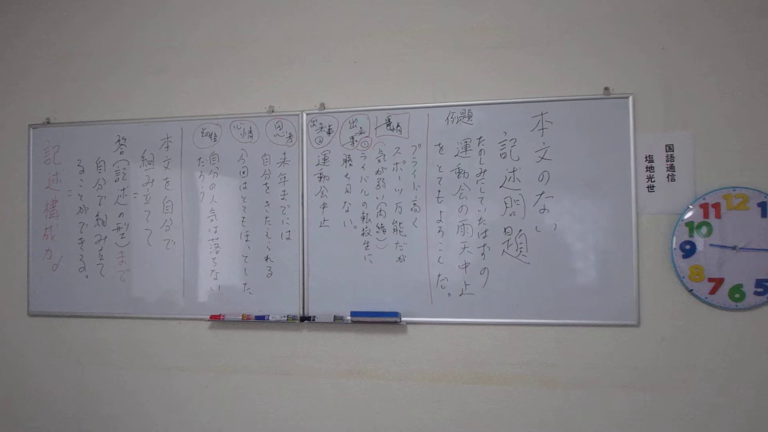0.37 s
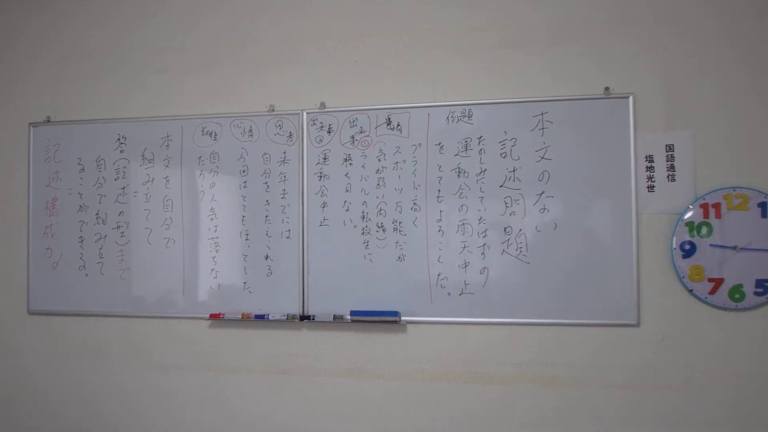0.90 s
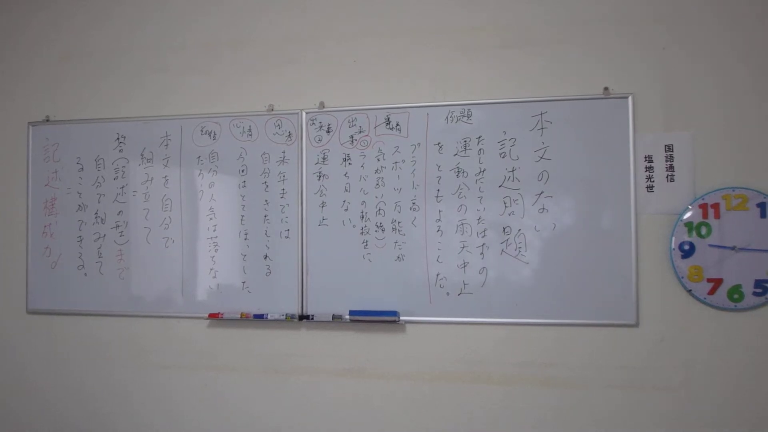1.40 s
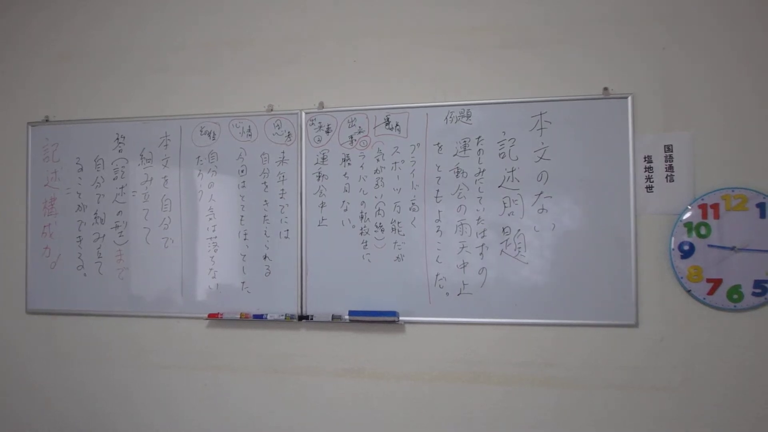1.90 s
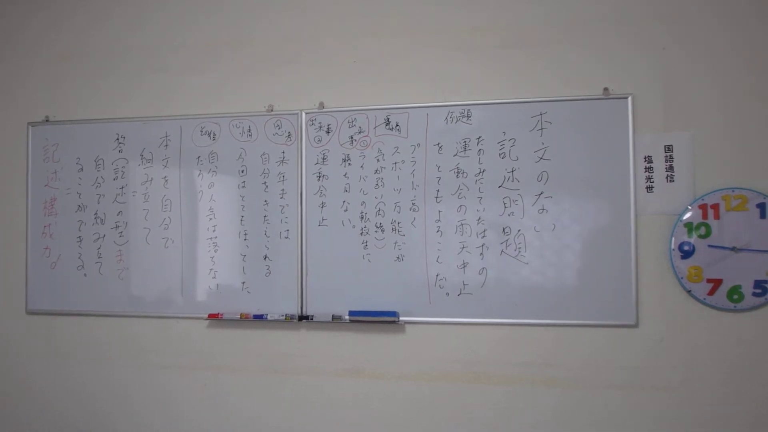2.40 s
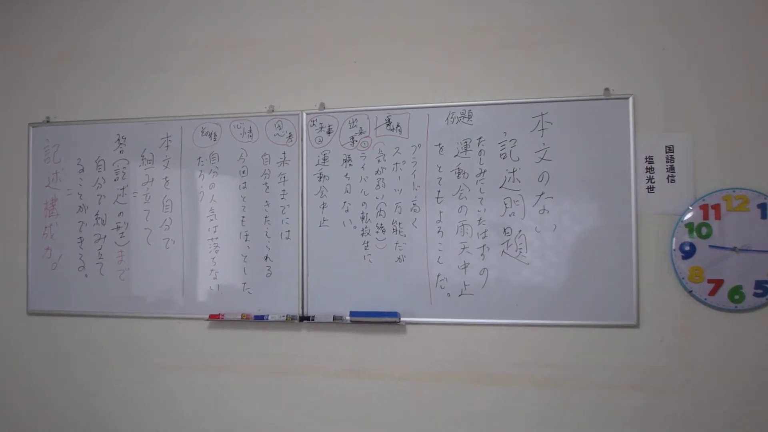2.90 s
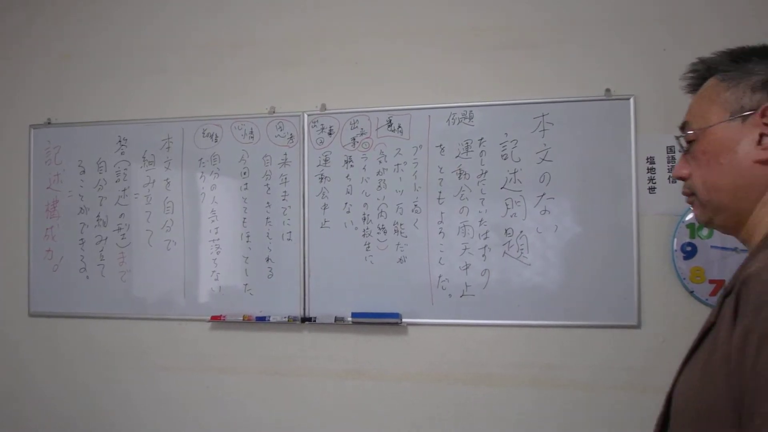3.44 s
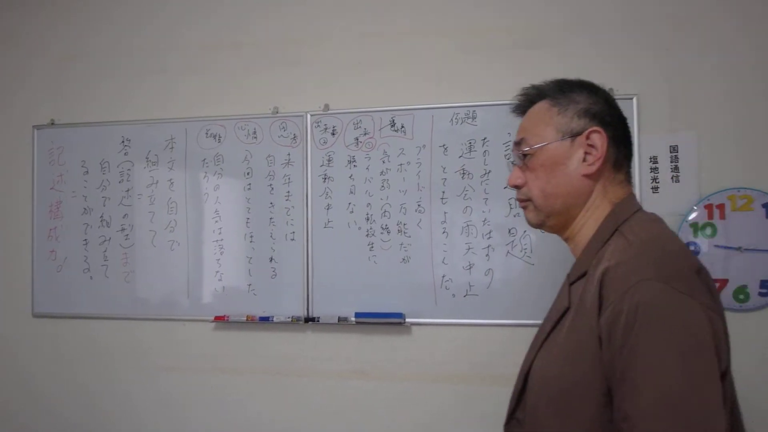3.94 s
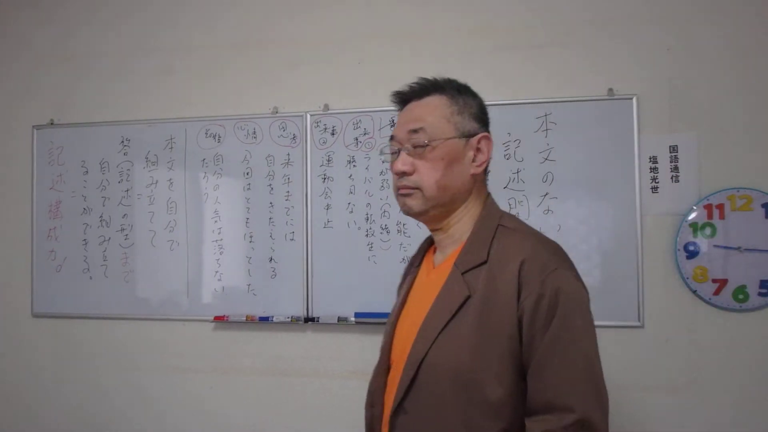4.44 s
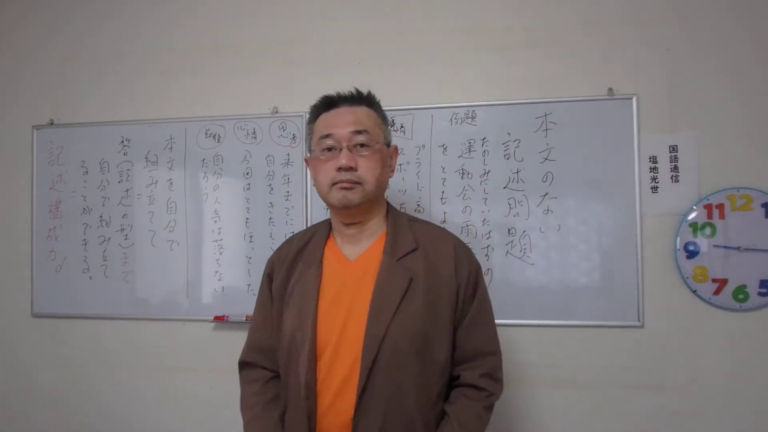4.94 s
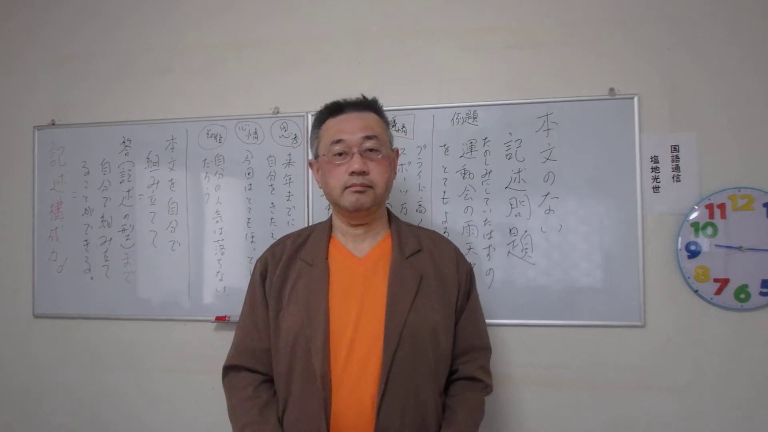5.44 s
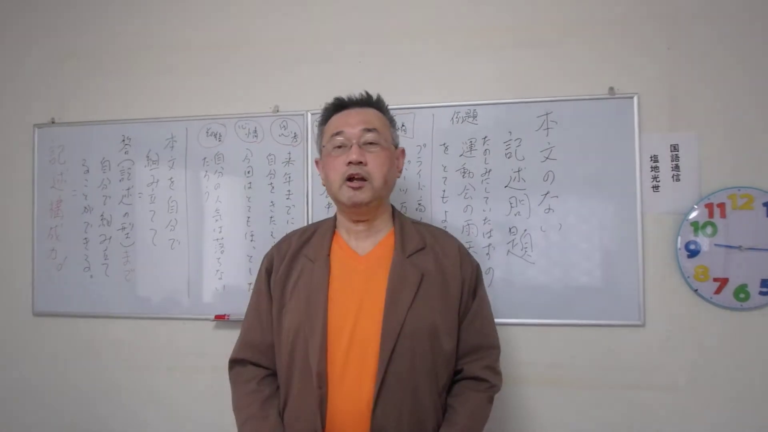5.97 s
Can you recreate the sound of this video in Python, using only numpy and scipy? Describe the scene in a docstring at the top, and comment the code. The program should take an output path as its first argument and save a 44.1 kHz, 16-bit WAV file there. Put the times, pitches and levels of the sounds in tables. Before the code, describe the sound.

Loose-soled footsteps thud and scuff across a hollow hard floor in a small bare room, with a brief rattle near the end.

```python
"""Loose soles in a bare room

Someone in loose soles walks over a hollow hard floor in a small bare room. Each step is a damped low thud
and a noise slap, both convolved with the echoes of the room; sliding soles scuff as grainy noise and
sometimes catch with a crack. A camera stand jolts at low pitch and rattles in brief ringing modes.
Under all lies steady room and preamp noise; the camera adds gain control, a bass cut and narrow notches."""
import sys
import numpy as np
from scipy import signal
from scipy.io import wavfile
from scipy.ndimage import uniform_filter1d, minimum_filter1d

SR = 44100
rng = np.random.default_rng(int(sys.argv[2]) if len(sys.argv) > 2 else 0)


def to_linear_factor(level_db):
    """Convert decibel levels (scalar or array-like) to linear amplitude factors."""
    exponent = np.asarray(level_db, float) / 20
    return 10 ** exponent


def bounce(signal):
    """Save signal as a 16-bit WAV file at the path given by the first command-line argument."""
    frames = np.transpose(np.atleast_2d(signal))
    limited = np.clip(frames, -1, 1)
    pcm = np.round(limited * 32767).astype(np.int16)
    wavfile.write(sys.argv[1], SR, pcm)


N = 268436
EDGES = 25 * 2 ** np.arange(0, 9.5, 1 / 3)   # third-octave band edges in Hz


def rms_one(x):
    """Power normalisation: scale to rms 1."""
    return x / np.sqrt(np.mean(x ** 2) + 1e-20)


def unit_energy(x):
    """Energy normalisation: scale so that the squares add up to 1."""
    return x / np.sqrt(np.sum(x ** 2))


def at_hz(points, hz):
    """Pitch is logarithmic: interpolate a table on a log-frequency axis."""
    table = np.array(points)
    return np.interp(np.log(hz), np.log(table[:, 0]), table[:, 1])


def butter(x, hz, kind, order=2):
    """Causal filtering with a maximally flat Butterworth response."""
    return signal.sosfilt(signal.butter(order, hz, kind, fs=SR, output="sos"), x)


def colour(x, spectrum):
    """Spectral shaping by a causal bank of wide bands, each with its own gain."""
    total = 0
    for low, high in zip(EDGES[::2], EDGES[2::2]):
        gain = to_linear_factor(at_hz(spectrum, np.sqrt(low * high)))
        total = total + gain * butter(x, [low, high], "band", order=1)
    return total


def dying(t, t60):
    """Exponential decay: 60 dB in t60 seconds."""
    return to_linear_factor(-60 * t / t60)


def add(out, x, s):
    """Superposition: mix x in at time s."""
    i = round(s * SR)
    out[..., i:i + x.shape[-1]] += x[..., :N - i]


def leaning(x):
    """Level difference between the ears: a close sound is 3.5 dB stronger on the right."""
    return x * to_linear_factor(3.5 * np.array([[-.5], [.5]]))


# Likeness of the two close microphones. Each row: frequency in Hz, left-right correlation of the background.
LIKENESS = [(60, 0.52), (600, 0.6), (2000, 0.86), (4000, 0.68), (8000, 0.43), (14000, 0.1)]
# Balance of the microphones. Each row: frequency in Hz, right channel above left in dB.
RIGHT_DB = [(100, 2), (2000, 2.5), (4000, 2), (8000, -1), (12000, 1)]


def bands(size, spread=1.0):
    """Partial coherence: stereo noise in third octaves, mixed from mid and side; spread scales unlikeness."""
    white = rng.standard_normal((2, 2, size))
    for k, (low, high) in enumerate(zip(EDGES, EDGES[1:])):
        mid, side = butter(white[k % 2], [low, high], "band")
        hz = np.sqrt(low * high)
        alike = np.clip(1 - spread * (1 - at_hz(LIKENESS, hz)), 0, 1)
        both = np.sqrt(1 + alike) * mid + np.sqrt(1 - alike) * side * [[1], [-1]]
        yield hz, both * to_linear_factor(at_hz(RIGHT_DB, hz) * np.array([[-.5], [.5]]))


# Footfalls. Each row: start in seconds, thud level in dB, thud pitch in Hz, cycles until the boards swing
# fully, slap relative to thud in dB, room relative to direct sound in dB (the last two before overall gains).
STEPS = [(.568, -12.5, 155, 1.5, -15.5, -7.5), (.63, -24.5, 161, 1, -17, -3.5),
         (1.346, -22, 144.7, 1.8, -17, -1), (1.370, -7.5, 166, 0.87, -4, -4),
         (1.535, -21, 125.5, 1.3, -8, -7.5), (2.031, -26.5, 123, .7, -14.5, 0),
         (2.236, -21, 132, 1.04, -16.5, -1.5), (2.30, -27, 205, 1.2, -4.5, -9.5),
         (2.708, -33.5, 207.6, 1.7, -18, -2), (2.764, -33, 136, 0.81, -7, -4.5),
         (2.882, -21.5, 118, 1.1, -19, 1), (3.232, -33, 184, 1.7, -26, -5.5),
         (3.381, -34, 96.3, 1.1, -16, -2), (3.601, -24.5, 227, 1.6, -4.5, -2.5),
         (3.665, -31.5, 289, 3.7, -1, -15.5), (3.945, -28, 102, 1.1, -17, -6),
         (4.000, -13.5, 140, 1.8, -5.5, 1.5), (4.170, -23, 122.6, 3.1, -7.5, -1.5),
         (4.596, -25.5, 105.8, 2.8, -14, -5), (4.638, -3.5, 110, 1.31, -12, -13.5),
         (5.031, -7, 164.6, 2.8, -9, -1.5)]
# Colour of the slap. Each row: frequency in Hz, relative spectral density in dB.
SLAP = [(120, 9), (250, 2), (400, 15), (800, -30.5), (1500, -20), (2800, -62), (4500, -14), (8000, -13)]


def steps():
    """Impact excitation: boards swell into a damped thud, the sole slaps the air out, the room answers both."""
    slap_gain_db, echoed_slap_gain_db, room_gain_db = 21, 21, 13.5
    roundness = 1.95   # higher starts softer and ends sooner
    out, t = np.zeros((2, N)), np.arange(int(.25 * SR)) / SR
    half, quarter = len(t) // 2, len(t) // 4
    tails = [room_tail() for spot in range(7)]
    crack = butter(colour(1. * (t == 0), SLAP), 4000, "low")
    for k, (s, db, hz, cycles, slap_db, room_db) in enumerate(STEPS):
        boards = np.sin(2 * np.pi * hz * t) + 0.4 * np.sin(2 * np.pi * 1.925 * hz * t)
        swell = t * hz / cycles
        direct = boards * (swell * np.exp(1 - swell)) ** roundness

        contact = rng.standard_normal(len(t)) * dying(t, 0.058)   # the sole lands unevenly
        slap = unit_energy(np.convolve(contact[:half], crack[:quarter])[:half])
        direct[:half] += to_linear_factor(slap_db + slap_gain_db) * slap
        add(out, leaning(to_linear_factor(db) * direct), s)

        # the air is pushed once, so the echoes are broad in pitch
        push = np.sin(2 * np.pi * 1.41 * hz * t) * dying(t, 3.05 / hz)
        push = butter(push, 0.62 * hz, "high")
        push += to_linear_factor(slap_db + echoed_slap_gain_db) * unit_energy(crack)
        echoes = signal.fftconvolve(push[None], tails[k % len(tails)], axes=1)
        add(out, to_linear_factor(db + room_db + room_gain_db) * echoes, s)
    return out


# Standing waves of the room. Each row: frequency in Hz, relative level in dB, t60 in seconds.
ROOM_MODES = [(140, -3.5, 0.41), (208, -1.5, 0.4), (301, 3, 0.34), (338.5, -3.5, 0.53), (400, -8, 0.12),
              (452.8, 0.5, 0.37), (489, 3, 0.23), (583, -3, 0.4), (662, 0, 0.34), (859, -9, 0.23),
              (970, -21, 0.31)]
# Reverberation of the room. Each row: frequency in Hz, t60 in seconds.
ROOM_T60 = [(60, 0.72), (150, 0.41), (500, 0.64), (1500, 0.5), (4000, 0.26), (10000, 0.04)]


def room_tail(modes_db=-13.5, build_s=0.014):
    """Reverberation from one spot: a diffuse field dying band by band, plus standing waves of varied strength."""
    t = np.arange(int(.7 * SR)) / SR
    diffuse = 0
    for hz, band in bands(len(t), 0.12):   # steps differ less between the microphones than the background
        t60 = at_hz(ROOM_T60, hz)
        diffuse = diffuse + np.sqrt(hz * t60) * unit_energy(band * dying(t, t60))
    standing = 0
    for hz, db, t60 in ROOM_MODES:
        strength = to_linear_factor(db + 2 * rng.standard_normal())
        standing = standing + strength * dying(t, t60) * np.sin(2 * np.pi * (hz * t + rng.random()))
    standing = leaning(to_linear_factor(modes_db) * standing)
    build_up = 1 - np.exp(-t / build_s)
    return (diffuse / SR ** .5 + standing / 100) * build_up


# Soles sliding on the floor. Each row: time of the peak in seconds, hiss level in dB, swell time in seconds,
# low rasp relative to hiss in dB, thin top relative to hiss in dB.
SCUFFS = [(.36, -59, .4, -8, -33), (0.593, -48, 0.047, 1, -7), (.8, -49, 0.22, -3.5, -9),
          (1.385, -44, 0.035, 10, -6), (1.57, -52.5, 0.083, -6, -10), (1.9, -53.5, 0.049, -9.5, -1),
          (2.068, -30.5, 0.012, -6.5, -1), (2.329, -47, .2, 1.5, -10), (2.69, -47, 0.075, -2, -7),
          (2.8, -54.5, .15, -0.5, -7), (2.92, -49.5, .04, -4.5, -7), (3.26, -49, 0.073, -3, -2),
          (3.434, -41, 0.034, -12, 2.5), (3.675, -48, 0.15, 0.5, -14.5), (4.0, -44.5, 0.045, -2, -6),
          (4.25, -52, 0.74, 1.5, -3.5), (4.628, -35, .03, -17, -8.5), (5.039, -41, 0.0084, 5, -6)]
# Colours of hiss, rasp and thin top. Each row: frequency in Hz, relative spectral density in dB.
HISS = [(2500, 2), (3400, -2), (4300, 4), (5800, 8.5), (7000, 13), (8500, -20), (10000, -65)]
RASP = [(500, -5.5), (1200, -5), (2000, 3), (3500, -5.5), (5000, -38)]
THIN = [(7000, -17), (8500, 6), (10500, -1), (12000, -8), (13500, -26)]
# Fading after the peak, in dB per second: hiss, rasp, thin top.
FADE_DB_PER_S = [110.5, 101, 149]


def scuffs():
    """Friction noise: three layers of coloured noise, modulated by the grain of the surface."""
    s, hiss_db, swell_s, rasp_db, thin_db = np.transpose(SCUFFS)
    layers = 0
    for hz, band in bands(N):
        gains = to_linear_factor(np.array([at_hz(table, hz) for table in (HISS, RASP, THIN)]))
        layers = layers + gains[:, None, None] * band
    sliding = 0
    for re_db, fade, layer in zip((0, rasp_db, thin_db), FADE_DB_PER_S, layers):
        sliding = sliding + slide(s, swell_s, hiss_db + re_db, fade) * rms_one(layer)
    grain = to_linear_factor(0.8 * rms_one(butter(rng.standard_normal(N), 120, "low")))
    return grain * sliding


def slide(s, swell_s, levels_db, fade_db_per_s):
    """Incoherent addition of envelopes: each swells to its peak, then fades at a steady rate; powers add."""
    t = np.arange(0, N + 64, 64) / SR
    before = s[:, None] - t
    rise_db = 20 * before / swell_s[:, None]   # 20 dB within the swell time
    below_db = np.maximum(rise_db, -fade_db_per_s * before)
    power = np.sum(to_linear_factor(levels_db[:, None] - below_db) ** 2, axis=0)
    return np.interp(np.arange(N) / SR, t, np.sqrt(power))


# Catches of a sliding sole. Each row: start in seconds, peak level in dB before the lean to the right.
SNAGS = [(2.071, -25), (3.4368, -15.5)]


def snags():
    """Stick-slip: each catch is a bright crack of about a millisecond, led up to by three lighter slips."""
    stutter_s, stutter_db = .0035, 6   # mean spacing of slips (about), weakening from slip to slip
    out, t = np.zeros((2, N)), np.arange(int(.02 * SR)) / SR
    for s, db in SNAGS:
        for k in range(4):   # backwards from the catch
            noise = rng.standard_normal((2, len(t))) * dying(t, 0.0023)
            crack = butter(noise, [5500, 13000], "band")
            crack = crack / np.abs(crack).max()
            start = s - stutter_s * k * rng.uniform(0.56, 1.2)
            add(out, leaning(to_linear_factor(db - stutter_db * k) * crack), start)
    return out


# Ticks of the camera against its stand. Each row: start in seconds, level in dB, bright edge relative in dB.
RATTLE = [(4.663, -10, -2), (4.6756, -19, -18), (4.6895, -17, -19), (4.7015, -17, -23), (4.711, -20, -20)]
# Ringing modes of the loose part. Each row: frequency in Hz, relative level in dB, t60 in seconds.
RATTLE_MODES = [(2220, -11.5, 0.026), (5660, 3, 0.0048), (5980, 3, 0.0073), (6700, -3, 0.0051)]


def stand():
    """Modal ringing: a slow jolt travels up the legs, then a loose part ticks, each tick with a duller rebound."""
    out, t = np.zeros((2, N)), np.arange(int(.1 * SR)) / SR
    jolt = np.sin(2 * np.pi * 28 * t) * dying(t, 0.1)
    add(out, leaning(to_linear_factor(4) * jolt), 4.645)
    for s, db, edge_db in RATTLE:
        ring = np.zeros((2, len(t)))
        for side in range(2):
            for hz, mode_db, t60 in RATTLE_MODES:
                mode = dying(t, t60) * np.sin(2 * np.pi * hz * t + rng.normal(0, 1.0))
                ring[side] += to_linear_factor(mode_db - 7) * mode
        edge = butter(rng.standard_normal((2, len(t))) * dying(t, 0.0031), [8000, 15500], "band")
        add(out, to_linear_factor(db) * (ring + leaning(to_linear_factor(edge_db) * edge)), s)
        add(out, to_linear_factor(db - 4) * ring, s + .0027)   # the rebound has no bright edge
    return out


# Noise of room and preamp. Each row: frequency in Hz, relative spectral density in dB.
AIR = [(22, 19.5), (35, 17.5), (64, 6.5), (160, 3.5), (350, 2), (420, -3.5), (640, -7), (1700, -13),
       (2900, -16), (3400, -24), (4200, -18.5), (7000, -22), (14000, -24), (16000, -17)]


def air():
    """Stationary noise: the steady background of room and preamp, summed band by band."""
    noise = 0
    for hz, band in bands(N):
        noise = noise + to_linear_factor(at_hz(AIR, hz)) * band
    return to_linear_factor(-42.5) * rms_one(noise)


def scene():
    """Superposition of steps, scuffs, catches, stand and background."""
    return steps() + scuffs() + snags() + stand() + air()


def gain_control(x, threshold_db=-14, share=1.0, hold_s=0.041, release_db_s=10, attack_s=0.083):
    """Dynamic compression: loud peaks soon turn the gain down; it waits, then creeps back at a steady rate."""
    t = np.arange(N) / SR
    level_db = 20 * np.log10(uniform_filter1d(np.abs(x).max(axis=0), size=400) + 1e-9)
    cut_db = share * np.maximum(level_db - threshold_db, 0)
    released_db = np.maximum.accumulate(cut_db + release_db_s * t) - release_db_s * (t - hold_s)
    # deepest cut of the last two seconds
    recent_db = -minimum_filter1d(-cut_db, size=2 * SR + 1, origin=SR, mode="nearest")
    r = np.exp(-1 / (attack_s * SR))
    smooth_db = signal.lfilter([1 - r], [1, -r], np.clip(released_db, 0, recent_db))
    return x * to_linear_factor(-smooth_db)


def low_pass(x):
    """Removes everything above the highest recorded frequency."""
    return signal.sosfilt(signal.butter(12, 16630, fs=SR, output="sos"), x)


def record(dry):
    """Signal chain: gain control hears the deep bass cut after it; notches take out the camera's own whine."""
    x = dry + to_linear_factor(2.0) * butter(dry, [3150, 3950], "band")   # the microphone ports resonate
    x = gain_control(x)
    x = butter(x, 64.6, "high", order=4)
    for k in range(2, 7):
        notch_hz = k * 1026
        x = signal.lfilter(*signal.iirnotch(notch_hz, notch_hz / 100, fs=SR), x)
    x = signal.sosfilt(signal.cheby2(14, 60, 16250, fs=SR, output="sos"), x)   # 60 dB down above 16250 Hz
    x = x * np.clip((np.arange(N) / SR - 0.088) / 0.022, 0, 1)   # silent until 0.088 s, then a 22 ms fade-in
    mix = 1.101 * np.tanh(x / 0.78)   # soft saturation
    return low_pass(mix)


dry = scene()
out = record(dry)
bounce(out)
```